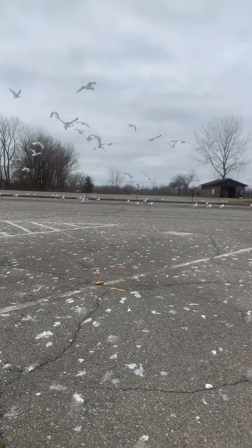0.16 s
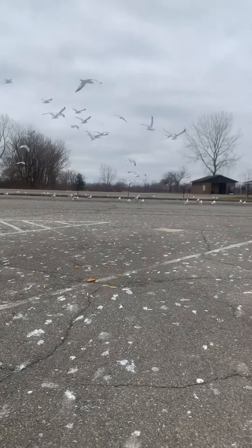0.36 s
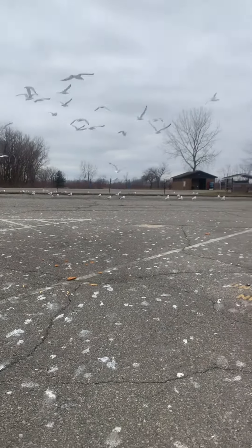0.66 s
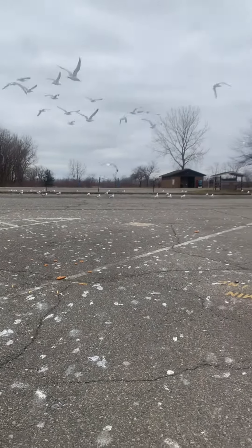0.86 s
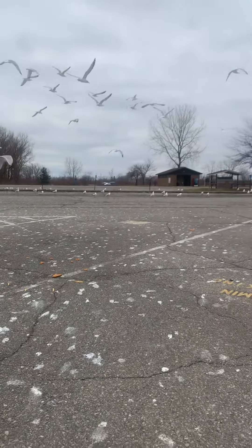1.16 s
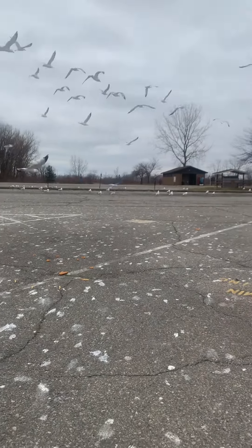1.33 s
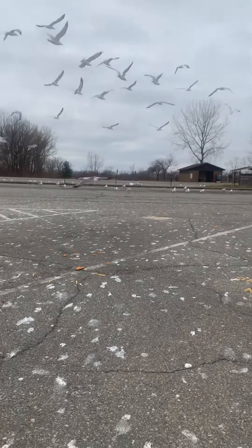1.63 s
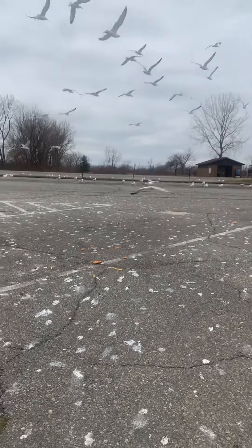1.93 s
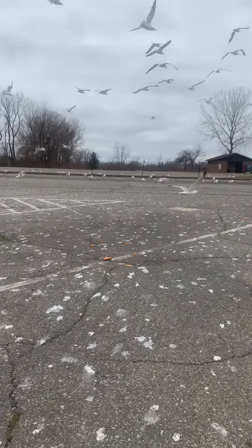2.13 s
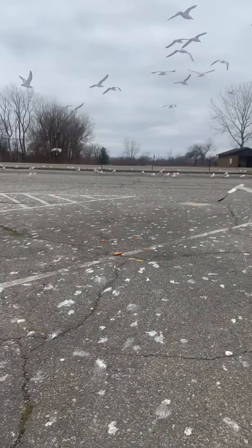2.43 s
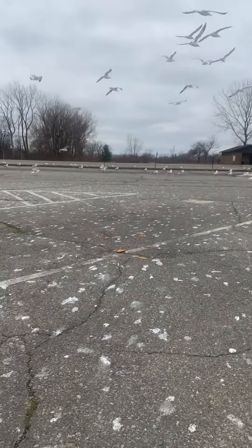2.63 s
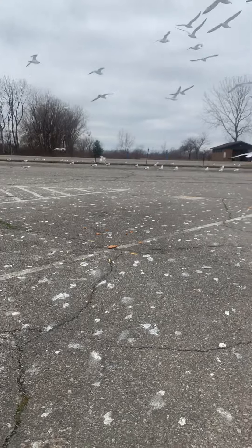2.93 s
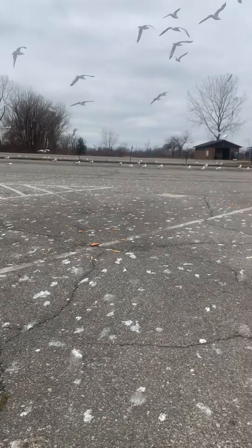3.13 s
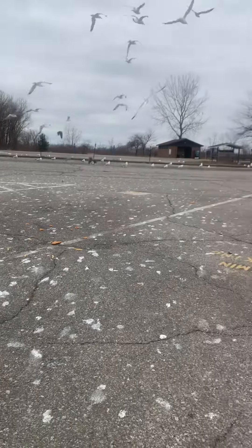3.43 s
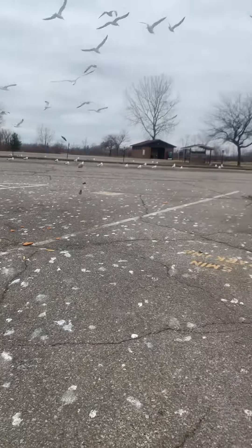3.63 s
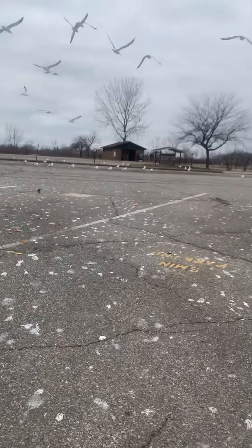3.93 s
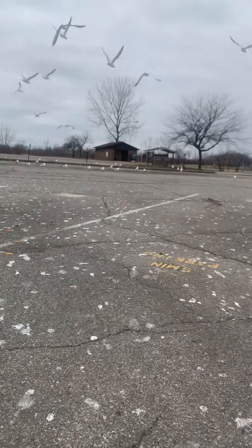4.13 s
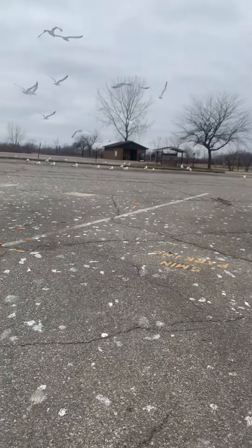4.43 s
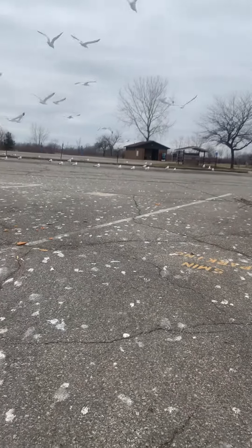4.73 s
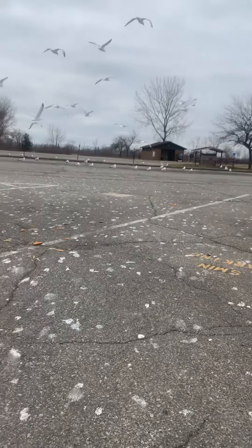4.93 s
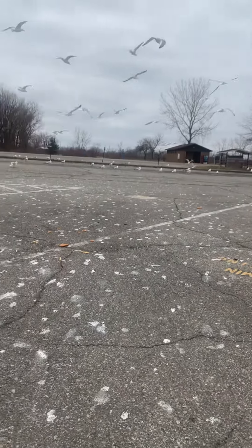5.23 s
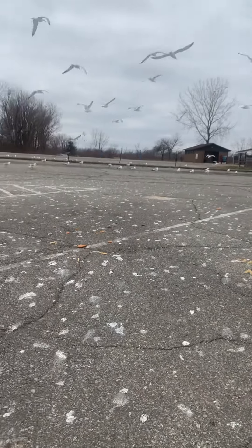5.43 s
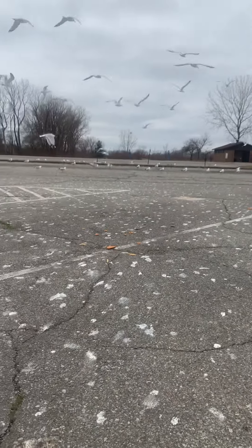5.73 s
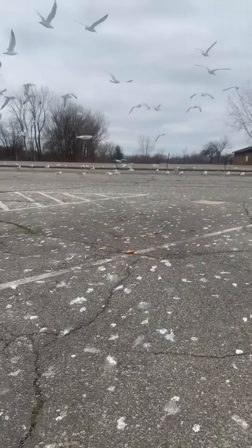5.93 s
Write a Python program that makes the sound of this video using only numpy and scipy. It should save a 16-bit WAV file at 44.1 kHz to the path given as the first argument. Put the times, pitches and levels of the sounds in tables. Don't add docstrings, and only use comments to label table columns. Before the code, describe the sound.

A large flock of gulls cries, mews and barks over an open paved lot while strong wind rumbles and pops on the microphone.

```python
import sys
import numpy as np
from scipy import signal
from scipy.fft import rfft, irfft, next_fast_len
from scipy.io import wavfile
from scipy.ndimage import uniform_filter1d

SR = 44100
rng = np.random.default_rng(int(sys.argv[2]) if len(sys.argv) > 2 else 0)


def materialize(psi):
    bounded = np.clip(np.atleast_2d(psi).T, -1, 1)
    quanta = np.round(bounded * 32767).astype(np.int16)
    wavfile.write(sys.argv[1], SR, quanta)


def rack_gain(trim_db):
    fader = np.asarray(trim_db, float)
    return 10 ** (fader / 20)


N = 267510


def rms_one(x):
    return x / np.sqrt(np.mean(x ** 2) + 1e-20)


def at_hz(points, hz):
    point_hz, point_db = np.transpose(points)
    return np.interp(np.log(hz), np.log(point_hz), point_db)


def drift(rate_hz, size=N):
    knots_per_s = 400
    knots = rng.standard_normal(int(size / SR * knots_per_s) + 402)
    r = np.exp(-2 * np.pi * rate_hz / knots_per_s)
    slow = rms_one(signal.lfilter([1], [1, -2 * r, r * r], knots)[400:])
    return np.interp(np.arange(size) * knots_per_s / SR, np.arange(len(slow)), slow)


def band(x, low_hz, high_hz):
    return signal.sosfilt(signal.butter(2, [low_hz, high_hz], "band", fs=SR, output="sos"), x)


def banded_noise(spectrum, gains_db, channels=1):
    low_end, high_end = spectrum[0][0], spectrum[-1][0]
    edges = low_end * 2 ** np.arange(0, np.log2(high_end / low_end) + .2, 1 / 3)
    white = rng.standard_normal((2, channels, N + SR // 10))
    total = 0
    for k, (low, high) in enumerate(zip(edges, edges[1:])):
        gain = rack_gain(at_hz(spectrum, np.sqrt(low * high)) + gains_db())
        total = total + gain * band(white[k % 2], low, high)[:, -N:]
    return rms_one(total)


def clicks(events):
    out = np.full(N, 1e-18)
    for s, peak_db in events:
        out[round(s * SR)] = rack_gain(peak_db) * rng.choice([-1, 1])
    return out


# start_s, rumble_db, turbulence_db (over the rumble)
GUSTS = [(0.06, -17, -18), (0.209, -15.5, -19.5), (0.29, -21.5, -7), (0.53, -15, -11), (1.14, -18, -10),
         (1.8, -17.5, -15.5), (1.91, -20.5, -11.5), (2.44, -18.5, -23), (2.5, -23, -9.5), (2.6, -22, -15),
         (2.68, -24, -13.5), (3.239, -21, -4.5), (3.31, -15.5, -14.5), (3.7, -21, -5.5), (3.85, -13.5, -14),
         (3.91, -16, -12.5), (5.92, -21.5, -21), (5.95, -19.5, -14.5)]
# pitch_hz, level_db (per Hz)
RUMBLE = [(12, -45.5), (20, -40), (48, 1.5), (70, 0.5), (157, -5.5), (260, -26), (340, -35), (570, -120)]
TURBULENCE = [(100, -9.5), (180, 0), (260, -2.5), (400, -13), (600, -23), (900, -36), (1300, -25.5),
              (1900, -106.5)]


def wind():
    s, rumble_db, over_db = np.transpose(GUSTS)
    t = np.arange(N) / SR
    rumble_db, over_db = np.interp(t, s, rumble_db), np.interp(t, s, over_db)
    gust = drift(11.7)
    eddies = drift(40) + .7 * gust
    rumble = rack_gain(rumble_db + 1.37 * gust) * banded_noise(RUMBLE, lambda: 0.54 * drift(6.6))
    lumps = banded_noise(TURBULENCE, lambda: 4.2 * np.minimum(eddies, 2.3) + 2.0 * drift(30))
    settle = np.clip(t[::-1] / .006, 0, 1)
    opening = rack_gain(-19) * np.exp(-t / .004)
    return opening + settle * (rumble + rack_gain(rumble_db + over_db + 2.5) * lumps)[0]


# pitch_hz, level_db (per Hz)
AIR = [(900, 1), (1400, 1), (1900, -17.5), (2300, -18), (3200, -17), (4800, -15.5), (6400, -25),
       (8200, -19), (9500, -26), (12500, -30.5), (15000, -32)]


def air():
    swell = .7 * drift(1.5) + 1.3 * drift(45)
    shared, own = banded_noise(AIR, lambda: swell + 1.2 * drift(14), channels=2)
    return rack_gain(-45) * (shared + 0.34 * own * np.array([[1], [-1]]))


def cry(rows, rasp, lead_us, *overtones_db):
    s, hz, level_db = np.transpose(rows)
    t = np.arange(round(s[0] * SR), min(round(s[-1] * SR), N)) / SR
    size = len(t)
    effort_db = np.interp(t, s, level_db)
    pitch = np.interp(t, s, hz) * (1 + 0.02 * rasp * drift(60, size))

    order = np.arange(1, 31, .5)
    order = order[(order * hz.mean() > 1250) & (order * hz.max() < 15500)][:, None]
    line_hz = order * hz.mean()
    colour_db = np.interp(line_hz, [2000, 4000, 6000, 8000, 15500], [*overtones_db, overtones_db[-1] - 16])
    colour_db = colour_db - 6 * np.exp(-((line_hz - 2750) / 330) ** 2)
    height = rack_gain(colour_db) * np.where(order % 1, 0.86 * rasp ** 2, 1)

    r = np.exp(-2 * np.pi * 90 / SR)
    smear = signal.lfilter([1], [1, -2 * r, r * r], rng.standard_normal((len(order), size + 300)))[:, 300:]
    lines = height * (1 - rasp + 1.3 * rasp * rms_one(smear)) / np.sqrt(np.sum(height ** 2) / 2)
    lines = lines * rack_gain(0.29 * np.log2(line_hz / 2000).clip(0) * (effort_db - level_db.max()))

    edge = np.clip(np.minimum(t - s[0], s[-1] - t) / 0.0079, 0, 1)
    chop_db = rasp * drift(50, size)
    throb = rack_gain((1.37 + 5.74 * rasp) * drift(22, size) + chop_db)
    phase = 2 * np.pi * np.cumsum(pitch) / SR * order + rng.uniform(0, 2 * np.pi, (len(order), 1))
    half_lead = np.pi * order * pitch * lead_us * 1e-6
    ears = [np.sum(lines * np.sin(phase + sign * half_lead), axis=0) for sign in (-1, 1)]
    return round(s[0] * SR), np.array(ears) * edge * throb * rack_gain(effort_db)


def flock(cries, voices):
    out = np.zeros((2, N))
    for rows, voice in zip(cries, voices):
        at, sound = cry(rows, *voice)
        out[:, at:at + sound.shape[1]] += sound
    return out


def far_flock(count):
    cries, voices = [], []
    for when, stretch, height, strength, side in rng.random((count, 5)):
        s, length = .25 + when * (N / SR - .45), .06 + .16 * stretch
        hz, db = 1380 + 620 * height, -51.5 + 10 * strength
        cries.append([(s, .93 * hz, db - 4), (s + length / 2, hz, db), (s + length, .9 * hz, db - 6)])
        voices.append((.5, 240 * side - 80, 0, -17, -30, -44))
    return flock(cries, voices)


# start_s, level_db
BUSTLE = [(0.05, -61), (0.68, -40.5), (0.83, -70.5), (1.11, -42), (1.41, -44), (1.74, -47), (2.15, -61),
          (2.4, -42), (2.77, -64), (3.08, -41), (3.73, -48.5), (4.42, -64), (4.61, -77), (4.84, -48),
          (5.02, -50), (5.39, -54), (5.57, -64), (6.0, -47.5)]


def distant():
    s, level_db = np.transpose(BUSTLE)
    return rack_gain(.6 * (np.interp(np.arange(N) / SR, s, level_db) + 53)) * far_flock(count=60)


# start_s, level_db
WINGS = [(.045, -47), (.065, -48), (.315, -47), (.412, -50.5), (.44, -45.5), (.555, -48), (.588, -41),
         (.765, -42), (.792, -50), (.85, -49), (1.245, -45), (1.34, -46), (1.42, -49), (1.53, -48),
         (2.425, -40), (2.535, -44), (2.65, -41.5), (2.86, -49), (3.08, -50), (3.6, -48), (4.02, -46),
         (4.44, -48.5), (4.555, -48), (4.785, -46), (5.035, -52), (5.225, -48.5), (5.27, -50), (5.535, -45),
         (5.59, -49.5), (5.72, -45.5), (5.745, -45)]


def wings():
    t, stroke_s = np.arange(N) / SR, 0.0056
    puffs = sum(rack_gain(db) * np.exp(-((t - at) / stroke_s) ** 2) for at, db in WINGS)
    shared, own = rms_one(band(rng.standard_normal((2, N)), 1500, 5600))
    return rack_gain(-3) * puffs * (shared + .12 * own * np.array([[1], [-1]]))


# start_s, peak_db
POPS = [(0.208, -20), (0.484, -16.5), (0.688, -14.5), (0.719, -10.5), (0.761, -20.5), (0.728, -21),
        (0.894, -22), (0.917, -18.5), (1.402, -20), (3.411, -24), (1.14, -24), (1.299, -15), (1.363, -17),
        (1.43, -11.5), (1.686, -20), (1.925, -7.5), (1.976, -24), (2.041, -19), (2.508, -14.5),
        (2.949, -25.5), (3.755, -23), (3.944, -22.5), (4.082, -19.5), (4.753, -19.5)]
# start_s, end_s, pitch_hz, level_db
FLUTTER = (5.532, 5.585, 211, -31)


def pops():
    start, end, hz, level_db = FLUTTER
    run = []
    for s in np.arange(start, end, 1 / hz):
        swell_db = 10 * np.sin(np.pi * ((s - start) / (end - start)) ** .5)
        run.append((s + rng.normal() / 20 / hz, level_db + swell_db + 2 * rng.normal()))
    snaps = rack_gain(28) * band(clicks(POPS), 210, 786)
    buzz = rack_gain(32) * band(band(np.abs(clicks(run)), 400, 1300), 370, 730)
    return signal.sosfilt(signal.butter(4, 1350, fs=SR, output="sos"), snaps + buzz)


def contour(start, length, first_hz, last_hz, level_db, arch, loudest, fade_db):
    u = np.linspace(0, 1, 17)
    slack = np.where(u < loudest, 1 - u / loudest, (u - loudest) / (1 - loudest)) ** 2
    hz = (first_hz + (last_hz - first_hz) * u) * (1 + arch * length * (1 - slack))
    return np.transpose([start + length * u, hz, level_db - fade_db * slack])


# start_s, length_s, first_pitch_hz, last_pitch_hz, level_db
WHISTLES = [(1.908, 0.125, 1890, 2050, -33), (2.185, .335, 1930, 1915, -34), (3.9, 0.13, 2004, 2080, -35),
            (4.315, 0.295, 1955, 2005, -35), (4.895, .19, 1965, 2010, -32)]
MEWS = [
    (0.312, 0.12, 1720, 1760, -52),
    (3.105, 0.24, 1850, 1862, -33),
    (4.089, 0.19, 882, 909, -30.5),
    (5.287, 0.135, 895, 892, -30),
    (5.768, 0.14, 900, 922, -32.5),
]
BARKS = [
    (2.436, 0.14, 720, 756, -46),
    (2.468, 0.15, 782, 782, -32),
]
BRAYS = [(1.17, 0.087, 773, 698, -46.5), (.495, 0.063, 700, 770, -43), (0.58, 0.066, 748, 770, -41),
         (.755, 0.042, 855, 804, -51), (1.333, 0.056, 1010, 1030, -28.5), (1.377, .135, 1018, 968, -33.5),
         (1.78, 0.059, 890, 1015, -36.5), (2.875, 0.049, 700, 690, -38.5), (1.8, 0.046, 665, 810, -44),
         (2.435, 0.075, 730, 520, -35), (.315, 0.14, 925, 680, -49)]
CROAKS = [
    (2.411, 0.1, 710, 705, -31.5),
    (1.3, .055, 657, 706, -42.5),
    (0.97, .05, 780, 682, -50),
    (4.787, .17, 580, 770, -43),
]
PIPES = [
    (0.657, 0.11, 2250, 2074, -37.5),
    (2.933, 0.24, 2390, 2400, -63),
    (3.605, 0.1, 2256, 2540, -34),
]
PEEPS = [(6.9, 0.045, 2300, 2750, -44), (3.845, 0.058, 1600, 1700, -31.5), (3.695, 0.048, 1920, 1820, -47),
         (3.5, 0.063, 1440, 1500, -34), (3.57, 0.048, 1500, 1620, -39), (4.5, .04, 2190, 2200, -40),
         (6.3, .03, 1400, 1700, -47), (3.6, 0.029, 2000, 1800, -45), (1.095, 0.051, 1720, 1100, -43),
         (2.745, 0.074, 1900, 1750, -36.5), (2.207, .08, 2020, 1680, -27.5),
         (3.591, 0.088, 1830, 1920, -35), (4.03, 0.049, 1800, 1910, -38), (4.6, 0.027, 1610, 1100, -43),
         (4.278, 0.066, 1300, 1720, -34), (5.42, 0.086, 940, 1100, -37.5), (5.525, .085, 1440, 1423, -35.5),
         (.445, .065, 1850, 1960, -34), (.622, .062, 1570, 1780, -34), (.505, .055, 1390, 1500, -29.5),
         (3.43, .075, 1560, 1520, -36), (.385, .04, 1400, 1380, -39), (1.855, .04, 1430, 1930, -33),
         (1.915, .11, 1870, 2020, -33), (4.862, .045, 1600, 1950, -37), (2.07, 0.12, 1520, 1450, -43),
         (5.407, .06, 2180, 2110, -33), (5.872, 0.095, 2170, 2070, -37), (5.975, 0.13, 2270, 2390, -40),
         (4.5, 0.041, 1800, 2270, -51)]
SIDE_PEEPS = [(0.303, .06, 1577, 1760, -39.5), (1.265, 0.02, 1750, 1780, -23.5),
              (1.289, 0.032, 1790, 1710, -23), (1.332, 0.014, 1690, 1670, -28),
              (1.478, 0.032, 1750, 1840, -37), (1.5, 0.037, 1700, 1690, -31.5),
              (1.525, 0.043, 1760, 1790, -37), (2.52, 0.13, 1874, 1667, -34),
              (3.05, 0.1, 1600, 1440, -37.5), (5.48, 0.039, 1810, 1760, -47),
              (2.678, 0.039, 1445, 1415, -36.5), (4.83, 0.065, 3470, 3530, -43),
              (1.55, 0.2, 1467, 1400, -38), (2.444, 0.1, 1373, 1398, -37), (2.777, 0.18, 1416, 1385, -38),
              (4.5, 0.13, 1834, 1766, -35.5), (4.795, 0.093, 1630, 1800, -37),
              (4.884, .11, 1843, 1824, -35)]
YELP = [(3.121, 0.18, 2175, 2030, -33.5)]
SQUEAL = [
    (3.684, 0.17, 3580, 3437, -32.5),
    (3.848, 0.112, 3410, 3310, -41.5),
]
SHRIEK = [(2.035, .2, 2970, 2912, -49)]
TAILS = [(1.582, 0.28, 1980, 1950, -38.5), (1.85, .05, 1940, 1840, -35), (2.929, .055, 1880, 1860, -39),
         (2.985, .075, 1820, 1780, -42), (5.078, .08, 1975, 1880, -38), (5.165, .07, 1880, 1820, -40),
         (4.61, 0.14, 1950, 1720, -53), (4.8, .09, 2030, 2100, -45), (4.585, .035, 2040, 1950, -39)]
CLEAR_BARK = [(0.571, .26, 976, 736, -34.5)]
SQUAWKS = [(0.296, .14, 640, 604, -54), (0.543, .07, 676, 762, -48), (0.755, 0.074, 840, 781, -46),
           (1.06, .12, 670, 700, -50), (1.459, .09, 640, 599, -46), (1.732, 0.22, 630, 585, -50),
           (2.223, 0.053, 725, 662, -48), (2.815, 0.11, 644, 723, -51.5), (3.069, 0.068, 620, 636, -53),
           (3.168, 0.071, 665, 603, -50.5), (3.535, 0.11, 619, 645, -52), (4.005, .28, 648, 652, -51.5),
           (4.411, .2, 693, 613, -61.5), (4.77, 0.14, 608, 676, -49.5), (5.229, 0.16, 680, 684, -52),
           (5.492, 0.13, 711, 659, -49.5), (5.702, .11, 640, 675, -50)]
SCOLD = [
    (1.252, 0.04, 734, 758, -35.5),
    (1.291, .052, 449, 436.6, -35),
]
WAIL = [(1.585, 0.2, 727, 691, -42)]
DROOP = [
    (2.522, 0.1, 920, 877, -33.5),
    (2.606, .05, 840, 780, -29.5),
]
THIN = [(3.322, .06, 4620, 4660, -46), (3.375, .055, 4900, 4970, -49), (3.075, .05, 2650, 2800, -48),
        (3.18, .075, 3850, 3950, -47), (5.31, .065, 3450, 3480, -47), (5.625, .055, 3950, 3850, -49),
        (2.93, .1, 4740, 4830, -52), (4.085, .08, 3220, 3260, -47), (2.655, .075, 2170, 2200, -51),
        (2.76, .09, 3780, 3900, -52), (.695, .055, 2900, 2740, -43), (2.78, .095, 2400, 2600, -52),
        (3.52, .08, 2930, 3100, -50), (3.275, .055, 3400, 3500, -53), (4.36, .08, 3330, 3450, -49),
        (4.44, .065, 3260, 3230, -50), (4.46, .13, 3820, 3860, -51), (5.755, .125, 4680, 4620, -50),
        (5.755, .045, 3940, 4010, -49), (5.81, .065, 3690, 3700, -48), (5.975, .05, 3680, 3740, -52),
        (5.23, .05, 3430, 3480, -49), (4.865, .04, 3200, 3230, -51), (3.6, .085, 3790, 3880, -50),
        (5.29, .035, 2560, 2780, -46), (.46, .03, 2440, 2480, -47)]
# rasp (0-1), right_lead_us, arch (share per s),
# loudest_at (share of the cry), end_fade_db
MANNERS = [(0.15, 40.5, 0.11, .63, 7), (0.3, 24, 0.055, 0.63, 12), (.55, -17.5, .7, 0.44, 12),
           (0.2, 3, .01, 0.35, 7), (0.5, 5, .15, 0.5, 4), (0.19, 10, 0.17, 0.54, 11),
           (.27, 6, 0.12, 0.7, 5), (0.24, 36, 0.144, 0.84, 4), (0.2, 10.5, 1.2, .68, 8),
           (0.17, 81, .2, .45, 3.5), (0, 5.5, 0.022, 0.63, -1.5), (0.07, 48, .01, 0.5, 1.5),
           (0.28, -9, .565, .44, 7), (.85, 13, .1, .5, 1.5), (0.35, 153, 0.11, 0.46, 2.5),
           (.18, 4.5, 0.22, 0.55, 5), (.26, -15, .15, .45, 3), (.15, 20, .05, .5, 4)]
# overtone level_db near 2, 4, 6 and 8 kHz
THROATS = [(2.5, 3, -23.5, -30), (12.5, -18, -14, -34), (2, 9, -8, -29), (3, -3.5, -15.5, -23),
           (1, 5.5, -4, -31), (4, 2.5, -8, -37), (29, -9.5, -12, -35.5), (15, -26, -36, -51),
           (2.5, -10, -15, -36), (-7, 3.5, -17, -22), (4, 2, -4.5, -9.5), (13.5, 2, -31, -41),
           (13.5, 0, -11, -15), (6, 11.5, -3, -22), (4.5, -7.5, -28, -40), (1, -1.5, -1, -35),
           (4.5, 6.5, -8, -13), (6, -11, -17, -37)]


def near_flock():
    birds = [WHISTLES, MEWS, BARKS, BRAYS, CROAKS, PIPES, PEEPS, SIDE_PEEPS, YELP, SQUEAL, SHRIEK, TAILS,
             CLEAR_BARK, SQUAWKS, SCOLD, WAIL, DROOP, THIN]
    out = np.zeros((2, N))
    for rows, (rasp, lead_us, *shape), throat in zip(birds, MANNERS, THROATS):
        cries = [contour(*row, *shape) for row in rows]
        out += flock(cries, [(rasp, lead_us, *throat)] * len(rows))
    return out


def lot(x):
    out = x.copy()
    for lag_s, echo_db in [(.004, -11), (.029, -19), (.071, -24)]:
        lag = round(lag_s * SR)
        out[:, lag:] += rack_gain(echo_db) * x[::-1, :-lag]
    return out


# start_s, peak_db
TICKS = [
    (3.7407, -35),
    (5.911, -35),
]


def ticks():
    return rack_gain(17) * band(clicks(TICKS), 6000, 15000)


# pitch_hz, right_lead (radians)
PORTS = [(1000, -2.6), (1900, -2.4), (3900, -2.6), (5100, -3.1), (7600, -5.9), (9650, -6.9), (15300, -12.4)]


def ports(x):
    size = next_fast_len(N + 4096)
    lead = np.interp(np.arange(size // 2 + 1) * SR / size, *np.transpose(PORTS))
    return irfft(rfft(x, size) * np.exp(.5j * lead * np.array([[-1], [1]])), size)[:, :N]


def scene():
    buffet = wind() + pops()
    hiss, far = air(), distant()
    return ports(lot(near_flock() + far) + hiss + ticks() + wings()) + buffet


# low_hz, high_hz
FRAIL_BANDS_HZ = [(2130, 2800), (4500, 5900), (10900, 15800)]


def drop_weak(pair, under_db, masked_db):
    mid, side = signal.stft(pair, nperseg=2048)[2]
    bins = np.arange(len(mid))
    centre = (bins // 11 * 11 + 5).clip(0, bins[-1])
    power = uniform_filter1d(np.abs(mid) ** 2, size=11, axis=0)[centre]
    around = uniform_filter1d(np.abs(mid) ** 2 + np.abs(side) ** 2, size=71, axis=0)
    hz = np.linspace(0, SR / 2, len(mid))[:, None]
    frail = sum((hz > low) & (hz < high) for low, high in FRAIL_BANDS_HZ) > 0
    usual = np.median(power, axis=1, keepdims=True)
    strong = (power > usual * rack_gain(2 * under_db)) & (power > around * rack_gain(2 * masked_db))
    return signal.istft(np.array([mid * (~frail | strong), side]), nperseg=2048)[1][:, :N]


def top_cut(x):
    return signal.sosfilt(signal.butter(12, 16580, fs=SR, output="sos"), x)


# low_hz, high_hz
SIDE_BANDS_HZ = [(760, 7650), (8950, 15200)]
# low_hz, high_hz
MID_GAP_HZ = (11800, 13150)


def record(dry):
    size = next_fast_len(N + 4096)
    hz = np.arange(size // 2 + 1) * SR / size
    mid, side = rfft([dry[0] + dry[1], dry[0] - dry[1]], size) / 2
    wide = sum((hz > low) & (hz < high) for low, high in SIDE_BANDS_HZ)
    side = side * np.clip(hz / 1350, 0, 1) ** 7.3 * wide
    mid = mid * ((hz < MID_GAP_HZ[0]) | (hz > MID_GAP_HZ[1])) * (hz < 15800)
    mid, side = drop_weak(irfft([mid, side], size)[:, :N], under_db=-2, masked_db=-11)
    return top_cut(np.array([mid + side, mid - side]))


dry = scene()
out = record(dry)
materialize(out)
```